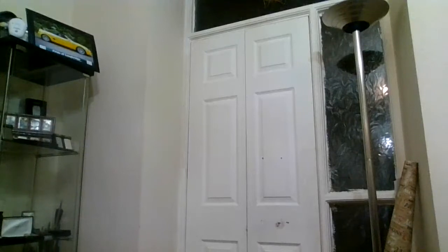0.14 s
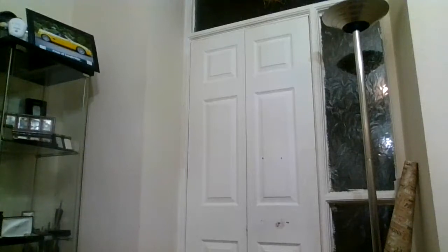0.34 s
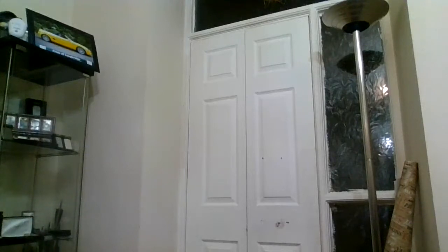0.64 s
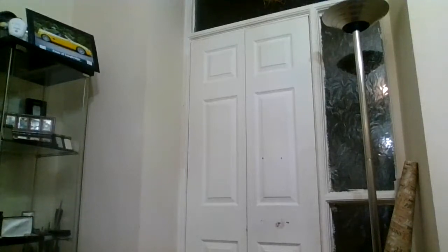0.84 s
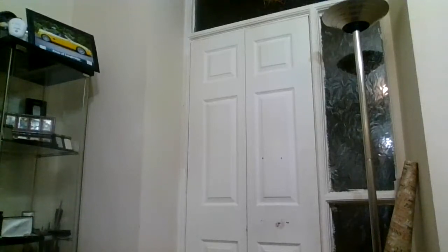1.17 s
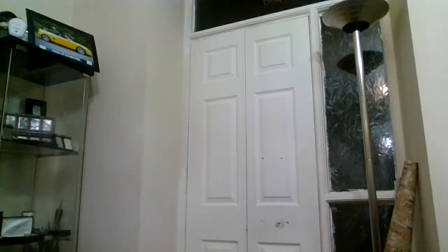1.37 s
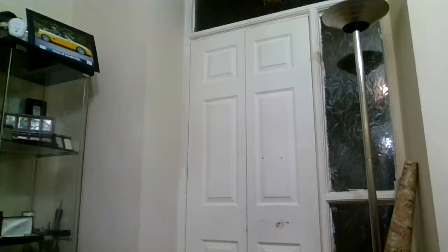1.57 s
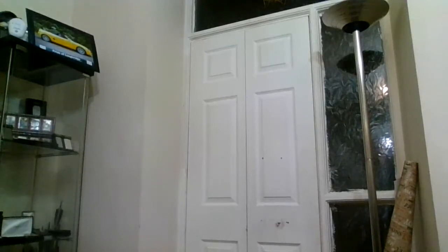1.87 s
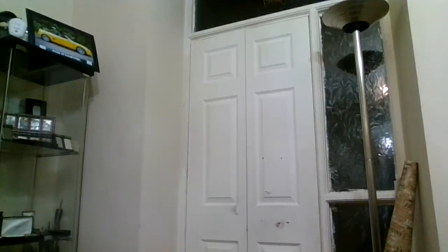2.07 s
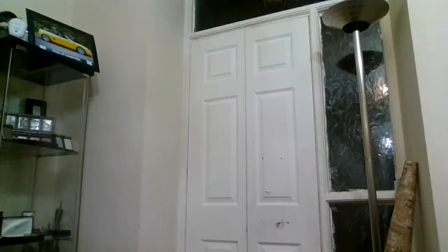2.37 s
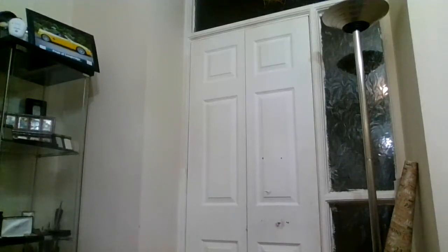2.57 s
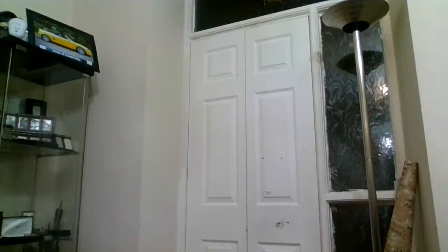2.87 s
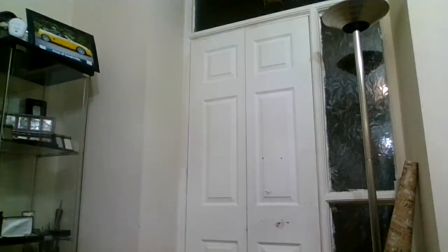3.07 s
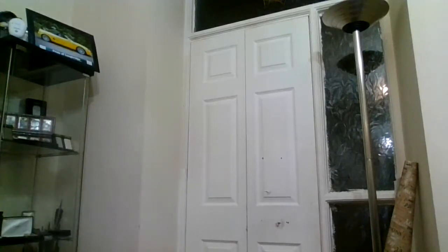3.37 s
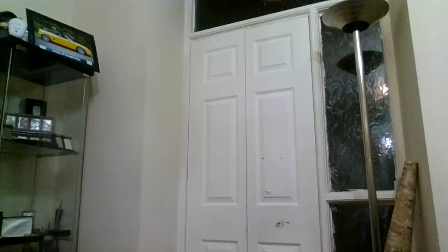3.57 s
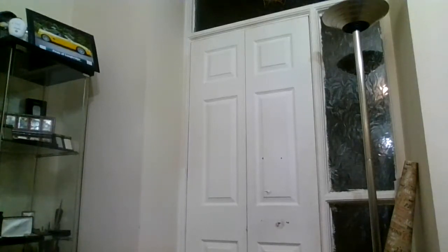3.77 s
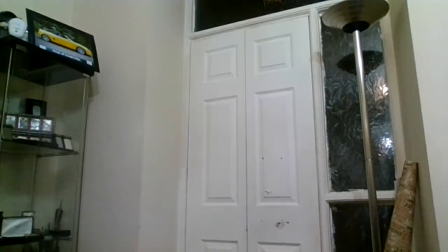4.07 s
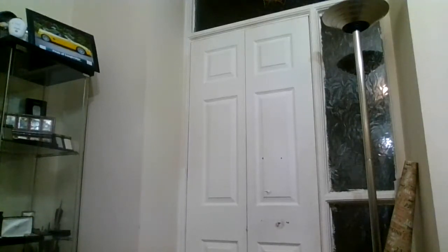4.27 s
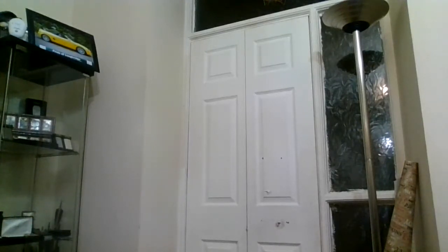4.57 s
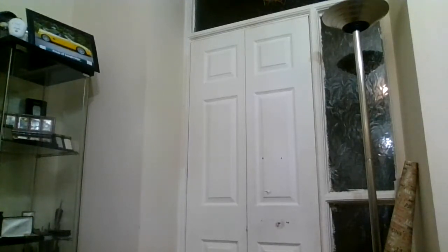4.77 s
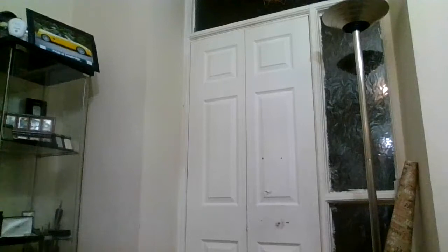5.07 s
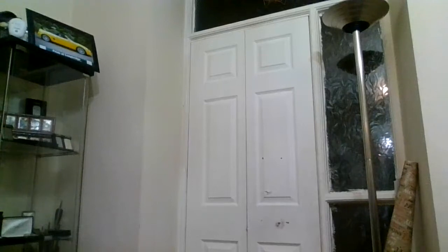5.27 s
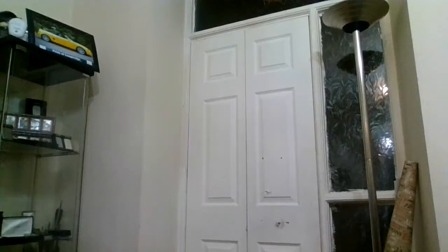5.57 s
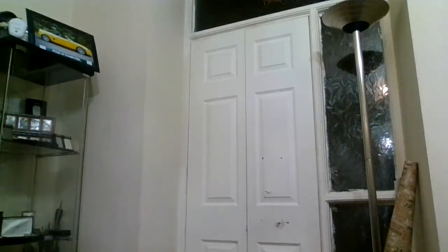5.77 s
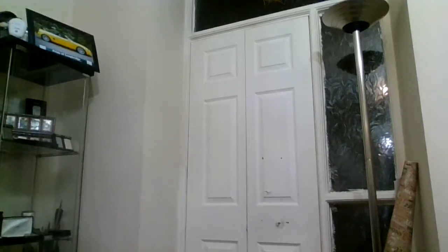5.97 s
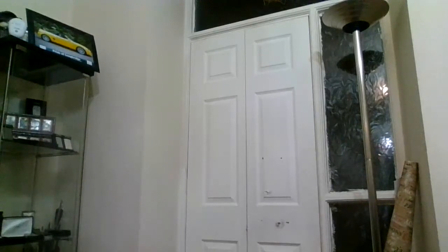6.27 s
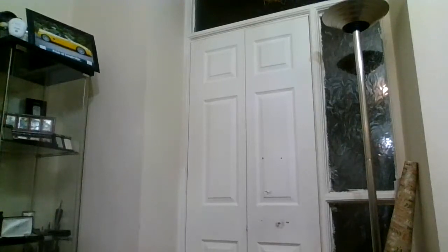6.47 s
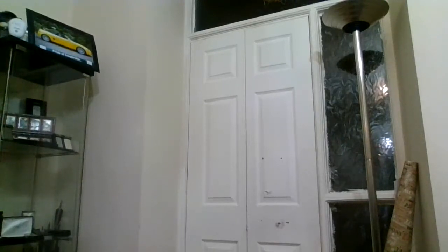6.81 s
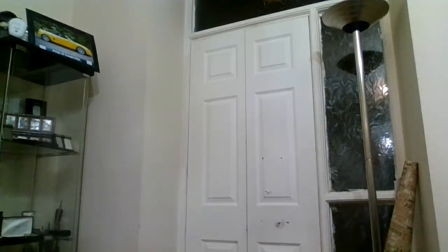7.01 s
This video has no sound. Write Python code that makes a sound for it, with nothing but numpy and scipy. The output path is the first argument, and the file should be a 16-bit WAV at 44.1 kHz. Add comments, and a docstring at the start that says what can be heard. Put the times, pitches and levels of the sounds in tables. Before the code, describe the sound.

Rubber bands whip and a dart slams into a wooden door with an overloaded crack, then bounces, rolls on the floor, and gear clatters.

```python
"""A faint hush and a few soft knocks of gear come first, in a small hard room. Then a slingshot's rubber bands whip
and its dart hits a wooden door; the blow and its pulse of air overload the microphone.
The dart drops, bounces and rolls on the floor. Afterwards the shooter moves: rustle, knocks, a scrape and a clatter.
Contacts are short cracks of noise plus room echoes, rubbing is a stream of tiny slips, and ringing is sine waves
or resonances; each is shaped to the colour of its material."""
import sys
import numpy as np
from scipy import signal
from scipy.fft import rfft, irfft, dct, next_fast_len
from scipy.io import wavfile

SR = 44100
rng = np.random.default_rng(int(sys.argv[2]) if len(sys.argv) > 2 else 0)


def waveform_to_disk(signal):
    """Save audio, clipped to [-1, 1], as 16-bit WAV at the path in sys.argv[1]."""
    frames = np.transpose(np.atleast_2d(signal))
    scaled = np.clip(frames, -1, 1) * 32767
    samples = np.round(scaled).astype(np.int16)
    wavfile.write(sys.argv[1], SR, samples)


N = 314962  # length of the scene in samples
TAIL = SR * 3 // 5  # length of one contact's echoes in samples

# Contacts, all as (time [s], level [dB], extra bass [dB], extra treble [dB])
# knocks and clicks of handled gear
GEAR_KNOCKS = [(0.57, -56.5, -1, -7), (0.828, -56.5, 17.5, -7), (1.6, -59, -1.5, -11),
               (3.455, -50.5, 1, 1.5), (3.632, -49.5, 12.5, 7.5), (3.872, -56.5, 5, 4),
               (4.003, -51.5, 22, 9.5), (4.82, -42, 13.5, -3.5), (5.673, -34, 6.5, 0),
               (5.9866, -27, -8.5, -.5), (6.174, -36.5, -5, -1), (6.222, -37, -4, 1.5),
               (6.272, -42.5, -2, 5), (6.355, -36, -14, -18), (6.378, -41, -1.5, 5),
               (6.403, -22.5, -3, -5.5), (6.412, -25, 3.5, 4.5), (6.44, -19, -6, 0.5),
               (6.538, -21.5, -6.5, -2.5), (7.0667, -49.5, 10, -.5), (7.125, -39, 0, 1)]
# rubber bands and pouch snapping forward
BAND_WHIPS = [(1.862, -45.5, 15, -11.0), (1.9065, -10.5, -3, -6.5), (1.9225, -9.5, -9, 3),
              (1.933, -12.0, 4, 2.5)]
# the blow on the door, then its clap in the frame
DOOR_BLOWS = [(2.044, 0, 3, -1.5), (2.063, 8.5, -2.5, 6.5), (2.12, 5.5, -2.5, 2.5)]
# the dart landing and bouncing
DART_BOUNCES = [(2.4084, -7.5, 4.5, 6.5), (2.427, -5.5, -11, -13), (2.517, -13, 0.5, 3),
                (2.665, -27, 10, -0.5), (2.704, -21, 6, -2.5), (2.786, -20, -2, -2.5), (2.815, -23, 0, 3.5),
                (2.94, -33.5, -5, -3), (2.985, -29.5, -0.5, -2.5), (3.09, -33.5, -6, -3),
                (3.15, -40.5, 5, -5)]

# contacts that also set the floorboard ringing: (time [s], level [dB])
FLOOR_THUMPS = [(2.409, -11.5), (2.436, -22), (2.705, -25.5), (6.404, -33.5), (7.125, -41.5)]
# dull low thuds as the shooter moves: (time [s], level [dB])
MOVING_THUDS = [(4.006, -52), (4.82, -56), (5.674, -44.5), (6.53, -51)]
# arm movements that rustle the clothes: (middle [s], length [s], level [dB])
ARM_STROKES = [(3.59, 0.12, -56.5), (4.14, 0.097, -55.5), (4.31, .12, -51.5), (4.565, 0.13, -49.5),
               (4.85, .3, -56.5), (5.04, 0.088, -55), (5.63, 0.18, -55.5), (5.78, 0.07, -47.5),
               (5.92, 0.13, -43), (6.95, .22, -57)]
# puffs of air stirred over the microphone: (middle [s], length [s], level [dB])
AIR_PUFFS = [(4.385, 0.097, -38.5), (4.56, 0.11, -52.5), (4.72, 0.045, -54), (4.83, 0.06, -50),
             (4.95, 0.14, -51)]

# ringing notes of the door panels: (frequency [Hz], level before the shared ring level [dB])
DOOR_NOTES = [(209.9, -31.5), (274.5, -31), (344.5, -32), (506.0, -28), (537.5, -21.5), (625, -26.5),
              (672.9, -25), (1129, -33), (1400, -32), (1499, -30.5), (1738, -30.5)]
# Resonances, all as (frequency [Hz], width [Hz], relative level [dB])
# the thin metal shaft of the dart
SHAFT_RESONANCES = [(9420, 113, -4), (12300, 400, -13.5), (14000, 180, 1.5)]
# the floorboard
BOARD_RESONANCES = [(700, 55, -4.5), (1140, 190, 0.5), (1640, 42, -7.5)]
# a small hard part of the gear
SNAP_RESONANCES = [(3400, 200, 3), (3900, 200, -4), (6400, 500, -15)]

# Colours, all as (frequency [Hz], relative level per Hz [dB])
# faint background hush
HUSH_COLOUR = [(12, -33.5), (20, 1.5), (80, 1.5), (119, -2), (157, -5), (180, -6.5), (342, -7.5),
               (440, -10), (550, -12), (1230, -18), (1870, -18.5), (3650, -21.5), (15500, -19.5)]
# knocking gear
GEAR_COLOUR = [(68, -47), (115, -22), (190, -10.5), (450, -8), (620, -3.5), (850, -2), (1500, -3),
               (2300, -4), (3700, -1.5), (6700, -4), (10300, -7.5), (14000, -3), (15500, -12)]
# rubber bands
RUBBER_COLOUR = [(35, -49), (60, -20), (201, -24.5), (248, -16), (497, -11), (792, -13), (1170, -5.5),
                 (1290, -10.5), (2410, -11.5), (2590, -9.5), (9970, -7), (12000, -3), (15500, -7.5)]
# wooden door
DOOR_COLOUR = [(15, -33), (25, -4), (93, -16.5), (340, -11), (389, -16), (537, -1.5), (684, -10.5),
               (848, -18.5), (945, -11), (1140, -19), (1450, -10), (3720, -17), (10100, -17.5),
               (13900, -14.5), (15500, -34)]
# the dart striking the floor
FLOOR_COLOUR = [(47, -50.5), (80, -18), (225, -24.5), (335, -11.5), (418, -14), (487, -5.5), (581, -4),
                (693, -2), (827, -2.5), (1150, -8), (2900, -9.5), (4130, -3), (7830, -13.5), (13600, -8),
                (15500, -17)]
# the dart rolling
ROLLING_COLOUR = [(88, -60), (150, -25.5), (205, -9), (244, -24), (346, -7.5), (500, -10), (812, -1),
                  (966, -4.5), (1110, -2.5), (2180, -11.5), (4140, -7.5), (10700, -18.5), (13800, -13),
                  (15500, -31)]
# rustling clothes
CLOTH_COLOUR = [(470, -29), (800, -0.5), (1840, -2.5), (2180, -3.5), (4430, -3.5), (9560, -5), (13400, 1),
                (15500, -5)]
# air moving over the microphone
BUFFET_COLOUR = [(12, -31.5), (20, 1), (35, -1), (70, -14), (280, -19.5), (450, -25.5), (1200, -38),
                 (2200, -73)]
# sliding gear
SCRAPING_COLOUR = [(100, -60), (200, -18), (380, -10), (600, -1.5), (820, 2), (1450, -1.5), (2300, -14.5),
                   (3200, -14), (4300, -5.5), (7000, -22), (13000, -26), (15500, -24)]

# how long the room echoes: (frequency [Hz], time to fall 60 dB [s])
ROOM_DECAY = [(60, 0.55), (250, .52), (1000, 0.45), (4000, 0.49), (9000, 0.44), (15000, 0.26)]

HUSH_DB = -60
RING_DB, RING_FOLLOWS, RING_T60 = -29, .2, .3  # shaft ring after a 0 dB bounce, dB per dB of bounce, decay (s)
ROLL_FROM, ROLL_STOP, ROLL_RISE_S = 2.64, 3.437, 0.4  # the dart settles into a roll and slows evenly to rest (s)
FIDGET_FROM, FIDGET_RISE_S, FIDGET_DB = 3.05, 0.25, -62.5  # faint rustle between movements: start (s), rise (s), level
SNAP_AT, SNAP_DB = 5.9866, -39  # a sharp click also rings a small hard part: (s), level (dB)
SLIDE_FROM, SLIDE_STOP, SLIDE_RISE_S = 6.16, 6.42, 0.074  # gear slides until it knocks against something (s)
SLIDE_DB, SLIDE_GROWS_DB_PER_S = -40.5, 15
RELEASE_T60 = 0.38  # a rubbing sound dies away with the room (s)
TOP_HZ = 15750  # nothing is heard above this frequency


def amp(db):
    """Turn decibels into a gain."""
    return 10 ** (np.asarray(db) / 20)


def unit(x):
    """Scale x to an average strength (rms) of 1."""
    return x / np.sqrt(np.mean(x ** 2) + 1e-20)


def along(points, hz):
    """Read a curve of (Hz, value) points on a log frequency axis."""
    f, v = np.transpose(points)
    return np.interp(np.log(hz + 1), np.log(f + 1), v)


def add(track, s, sound):
    """Mix a sound into the track at time s."""
    start = round(s * SR)
    track[start:start + len(sound)] += sound[:N - start]


def coloured(x, spectrum, bass_db=0, treble_db=0):
    """Filter x to a colour of unit power, then add a bass hump and a treble shelf."""
    size = 8192
    hz = np.fft.rfftfreq(size, 1 / SR)
    shelf_points = [(50, 0), (140, bass_db), (450, bass_db), (1200, 0), (4500, 0), (8000, treble_db)]
    gain = unit(amp(along(spectrum, hz))) * amp(along(shelf_points, hz))
    # folding the cepstrum forward makes a filter that never sounds ahead of its input
    cepstrum = irfft(np.log(np.maximum(gain, 1e-6)))
    cepstrum[1:size // 2] *= 2
    cepstrum[size // 2 + 1:] = 0
    impulse = irfft(np.exp(rfft(cepstrum)))
    return signal.fftconvolve(x, impulse)[:len(x)]


def resonate(x, modes):
    """Pass x through (Hz, width Hz, dB) resonances of unit power, as in a ringing body."""
    size = next_fast_len(len(x))
    hz = np.fft.rfftfreq(size, 1 / SR)
    body = 0
    for centre, width, db in modes:
        body = body + amp(db) * 1j * hz * width / (centre * centre - hz * hz + 1j * hz * width)
    body = body / np.sqrt(np.mean(np.abs(body) ** 2))
    return irfft(rfft(x, size) * body, size)[:len(x)]


def room_tail(walls=0, walls_s=0.012, early=.55, build_s=0.024):
    """Echoes of one contact: they thicken, crest as the nearest walls answer, and die treble first."""
    size = 128  # frame length in samples
    t = np.arange(TAIL) / SR
    frame_times = np.arange(0, TAIL, size)[:, None] / SR
    hz = np.arange(size) * SR / (2 * size)
    fade = amp(-60 * frame_times / along(ROOM_DECAY, hz))
    # random strengths in each frame and frequency band, turned back into sound
    bands_noise = rng.standard_normal(fade.shape) * fade
    tail = dct(bands_noise, type=3, norm="ortho").ravel()[:TAIL]
    thickening = 1 - (1 - early) * np.exp(-t / build_s)
    crest = walls * np.exp(-(2 * (t / walls_s - 1)) ** 2)
    return tail * (thickening + crest)


def contacts(rows, spectrum, direct, crack_s, soft_s, walls):
    """Make each contact a short crack followed by the room, in the colour of the struck thing."""
    track, t = np.zeros(N), np.arange(TAIL) / SR
    for s, db, bass_db, treble_db in rows:
        crack = direct * np.exp(-t / crack_s) * rng.standard_normal(TAIL)
        # a softer contact holds more bass and starts more gently
        onset = 1 - np.exp(-t / (soft_s * amp(bass_db / 2)))
        hit = onset * (crack + room_tail(walls))
        add(track, s, amp(db) * coloured(hit, spectrum, bass_db, treble_db))
    return track


def friction(rate, spread_db, wet):
    """Rubbing: tiny slips of uneven size, about rate a second, with their echoes; rms 1."""
    happens = rng.random(N) < rate / SR
    slips = happens * rng.standard_normal(N) * amp(spread_db * rng.standard_normal(N))
    echoes = signal.fftconvolve(slips, room_tail())[:N]
    return unit(unit(slips) + wet * unit(echoes))


def gate(start, stop, rise_s):
    """Gain over time: an even rise, a hold, then a release."""
    t = np.arange(N) / SR
    return np.clip((t - start) / rise_s, 0, 1) * amp(-60 * np.maximum(t - stop, 0) / RELEASE_T60)


def swells(rows):
    """Gain over time: each movement swells and ebbs in a bell, and their powers add."""
    t = np.arange(N) / SR
    return np.sqrt(sum(amp(db) ** 2 * np.exp(-(2 * (t - s) / length) ** 2) for s, length, db in rows))


def background_hush():
    """Steady noise, faint and strongest in the bass."""
    return amp(HUSH_DB) * coloured(rng.standard_normal(N), HUSH_COLOUR)


def gear_knocks():
    """Handled gear knocks and clicks, with a strong answer from the nearest walls."""
    return contacts(GEAR_KNOCKS, GEAR_COLOUR, direct=1.54, crack_s=0.0017, soft_s=0.0004, walls=0.38)


def bands(swish_db=-25, swish_s=0.0041):
    """Bands slap against the pouch and the fork; a swish of noise grows up to one slap and fades after it."""
    slaps = contacts(BAND_WHIPS, RUBBER_COLOUR, direct=0.26, crack_s=0.0023, soft_s=0.0011, walls=0.18)
    from_slap = np.abs(np.arange(N) / SR - BAND_WHIPS[1][0])
    swish = np.exp(-from_slap / swish_s) * coloured(rng.standard_normal(N), RUBBER_COLOUR)
    return slaps + amp(swish_db) * swish


def door(ring_db=13, ring_t60=0.88, knock_db=10, knock_hz=620, knock_s=0.0051,
         push_db=25, push_s=.0046, push_at=2.0462):
    """The blow cracks, dents and rings the panels and sends out a push and pull of air; the clap builds after it."""
    t = np.arange(SR) / SR
    track = contacts(DOOR_BLOWS[:1], DOOR_COLOUR, direct=0.8, crack_s=.002, soft_s=0.00042, walls=0.058)
    track += contacts(DOOR_BLOWS[1:], DOOR_COLOUR, direct=0.3, crack_s=.002, soft_s=0.0053, walls=0.2)
    knock = -amp(knock_db) * np.exp(-t / knock_s) * np.sin(2 * np.pi * knock_hz * t)
    add(track, DOOR_BLOWS[0][0], knock)
    # the panels ring from the start of the clap
    fade = amp(-60 * t / ring_t60)
    for hz, db in DOOR_NOTES:
        note = np.sin(2 * np.pi * (hz * t + rng.random()))
        add(track, DOOR_BLOWS[1][0], amp(db + ring_db) * fade * note)
    # one slow pulse of air: positive first, then negative
    u = t / push_s
    add(track, push_at, amp(push_db) * (1 - u) * np.exp(-u))
    return track


def dart_bounces():
    """The dart strikes the floor again and again, each time a crack with its echoes."""
    return contacts(DART_BOUNCES, FLOOR_COLOUR, direct=1.4, crack_s=0.0034, soft_s=.0005, walls=0.079)


def shaft_ring(rise_s=.008):
    """Every bounce sets the thin shaft ringing; a harder one only a little more."""
    power, t = np.zeros(N), np.arange(TAIL) / SR
    for s, db, _, _ in DART_BOUNCES:
        level = amp(RING_DB + RING_FOLLOWS * db - 60 * t / RING_T60)
        add(power, s, (level * (1 - np.exp(-t / rise_s))) ** 2)
    ringing = resonate(friction(rate=600, spread_db=1.0, wet=1.2), SHAFT_RESONANCES)
    return np.sqrt(power) * unit(ringing)


def floorboard():
    """A hollow wooden ring of the board under the heavier contacts."""
    track = np.zeros(N)
    for s, db in FLOOR_THUMPS:
        add(track, s, amp(db) * resonate(room_tail(early=.9), BOARD_RESONANCES))
    return track


def dart_roll(roll_db=-28, dulling=0.88, dull_hz=1800):
    """Rolling is a stream of slips that grows quieter and duller as the dart slows evenly to rest."""
    speed = np.clip((ROLL_STOP - np.arange(N) / SR) / (ROLL_STOP - ROLL_FROM), 0, 1)
    rolling = coloured(friction(rate=580, spread_db=2.0, wet=2.1), ROLLING_COLOUR)
    body = signal.sosfilt(signal.butter(2, dull_hz, fs=SR, output="sos"), rolling)
    treble = signal.sosfilt(signal.butter(2, dull_hz, "highpass", fs=SR, output="sos"), rolling)
    # the minus sign lets the two bands join without a notch
    mix = body - speed ** dulling * treble
    return amp(roll_db) * gate(ROLL_FROM, ROLL_STOP, ROLL_RISE_S) * speed * mix


def clothes():
    """Cloth rubs in many tiny slips, louder with each arm movement and faint in between."""
    fidget = amp(FIDGET_DB) * gate(FIDGET_FROM, N / SR, FIDGET_RISE_S)
    motion = np.hypot(swells(ARM_STROKES), fidget)
    return motion * coloured(friction(rate=1100, spread_db=0, wet=2.1), CLOTH_COLOUR)


def moving_thuds(thud_hz=150, thud_width_hz=70, thud_s=0.064):
    """Low thuds: one broad resonance that is soon damped."""
    track, t = np.zeros(N), np.arange(TAIL) / SR
    for s, db in MOVING_THUDS:
        damped = room_tail(walls=1.7) * np.exp(-t / thud_s)
        add(track, s, amp(db) * resonate(damped, [(thud_hz, thud_width_hz, 0)]))
    return track


def draught():
    """Movement stirs air over the microphone: puffs of mostly very low noise."""
    return swells(AIR_PUFFS) * coloured(rng.standard_normal(N), BUFFET_COLOUR)


def snap():
    """A sharp click rings the resonances of a small hard part."""
    track = np.zeros(N)
    add(track, SNAP_AT, amp(SNAP_DB) * resonate(room_tail(walls=.6), SNAP_RESONANCES))
    return track


def scrape():
    """Sliding gear slips in tiny steps, growing louder until it stops."""
    slid_s = np.clip(np.arange(N) / SR, SLIDE_FROM, SLIDE_STOP) - SLIDE_FROM
    growth = amp(SLIDE_DB + SLIDE_GROWS_DB_PER_S * slid_s)
    slide = growth * gate(SLIDE_FROM, SLIDE_STOP, SLIDE_RISE_S)
    return slide * coloured(friction(rate=1200, spread_db=1, wet=1.4), SCRAPING_COLOUR)


def scene():
    """Everything reaches one microphone, over a faint hush; both channels are the same."""
    slingshot = bands() + door()
    dart = dart_bounces() + shaft_ring() + dart_roll()
    shooter = gear_knocks() + clothes() + moving_thuds() + draught() + snap() + scrape()
    mono = background_hush() + slingshot + dart + floorboard() + shooter
    return np.array([mono, mono])


def record(dry, ceiling=0.88, hardness=6):
    """The microphone flattens the loudest peaks; a low-pass then removes everything above TOP_HZ."""
    clipped = dry / (1 + np.abs(dry / ceiling) ** hardness) ** (1 / hardness)
    lowpass = signal.firwin(401, TOP_HZ, fs=SR, window=("kaiser", 8))
    return signal.fftconvolve(clipped, lowpass[None], mode="same", axes=1)


dry = scene()
out = record(dry)
waveform_to_disk(out)
```